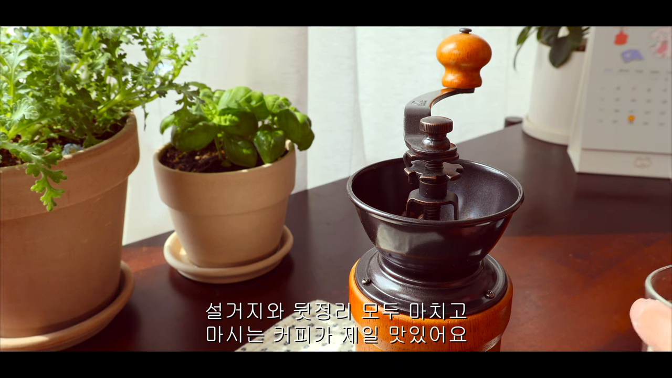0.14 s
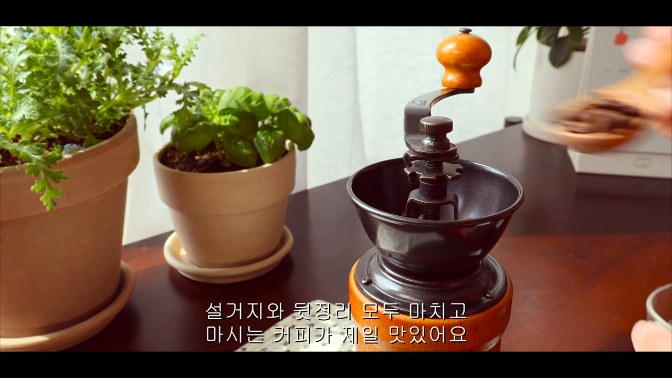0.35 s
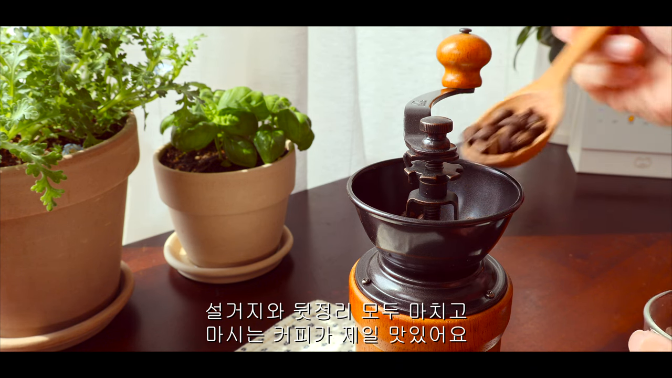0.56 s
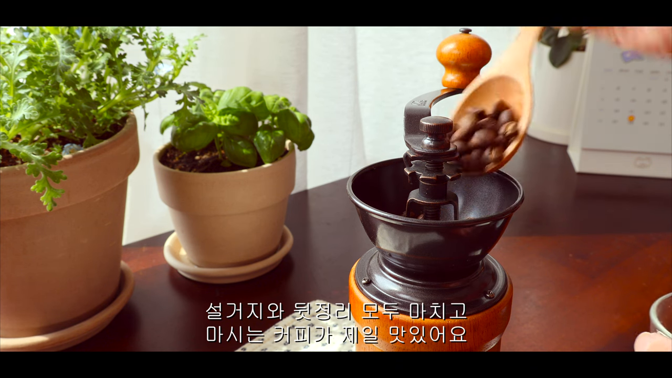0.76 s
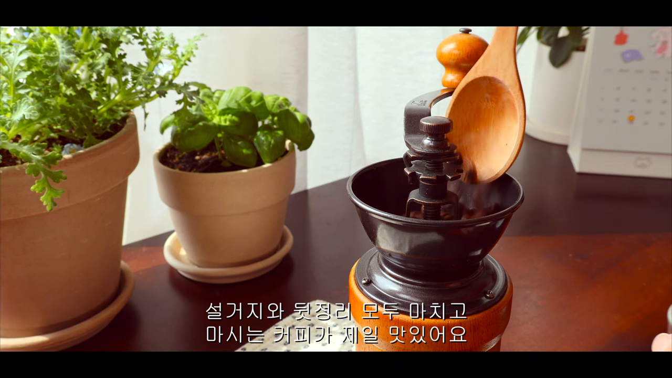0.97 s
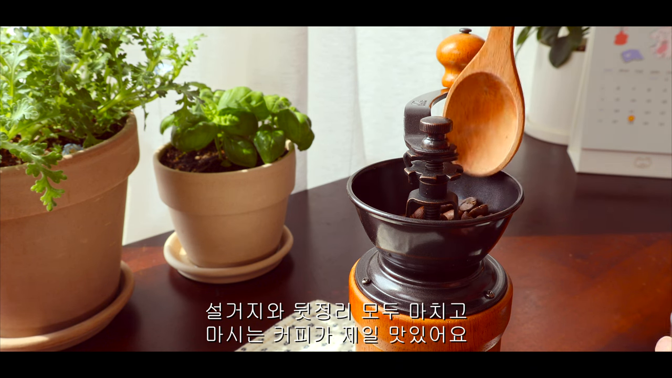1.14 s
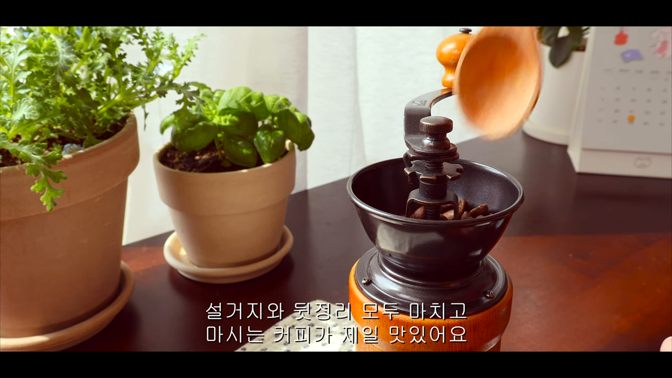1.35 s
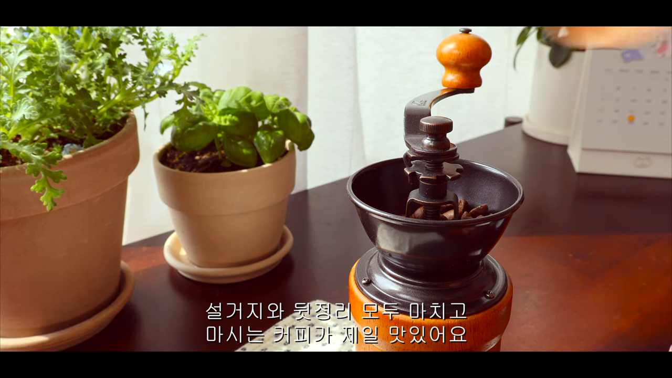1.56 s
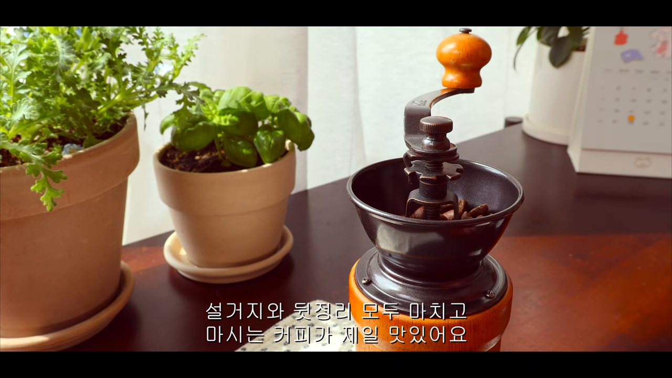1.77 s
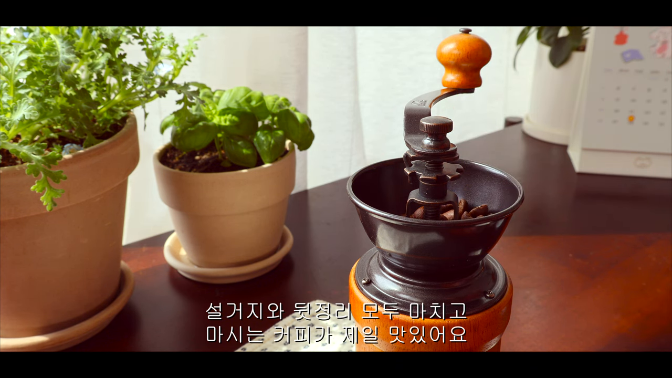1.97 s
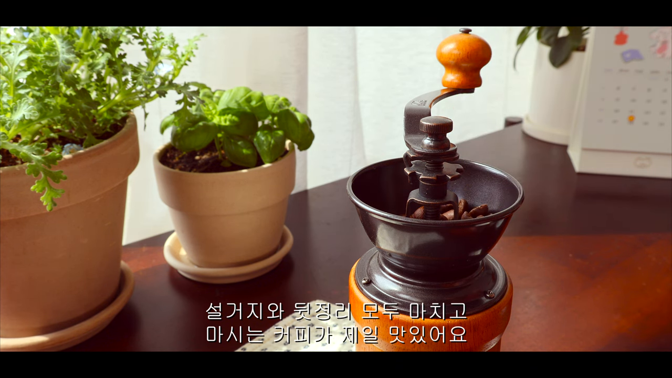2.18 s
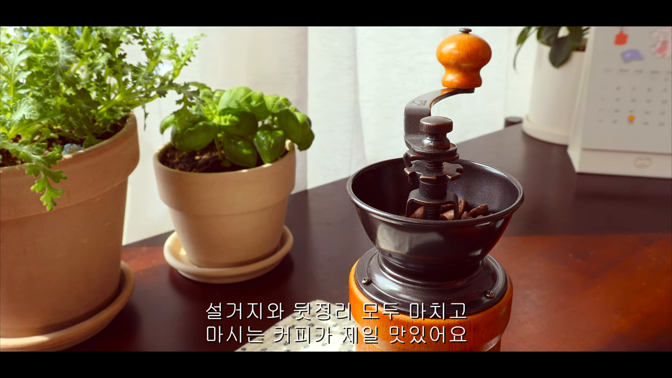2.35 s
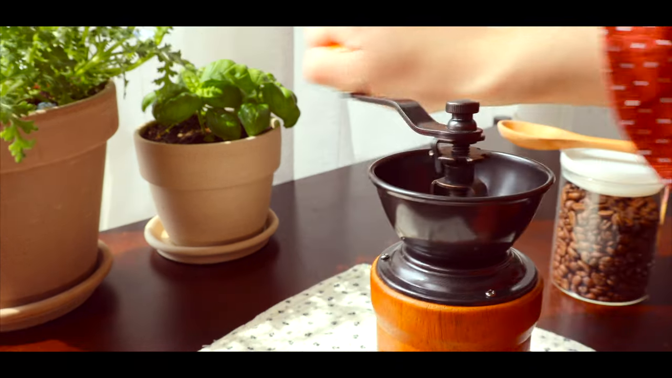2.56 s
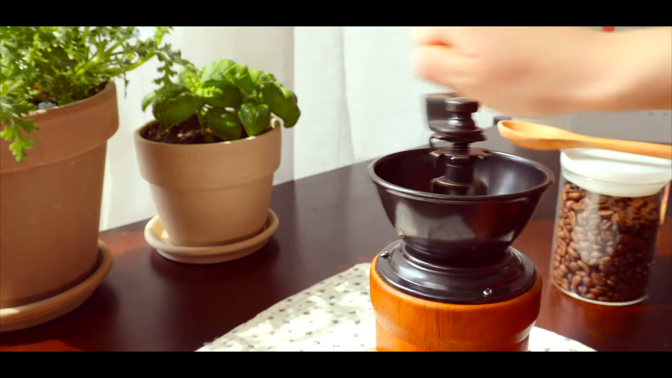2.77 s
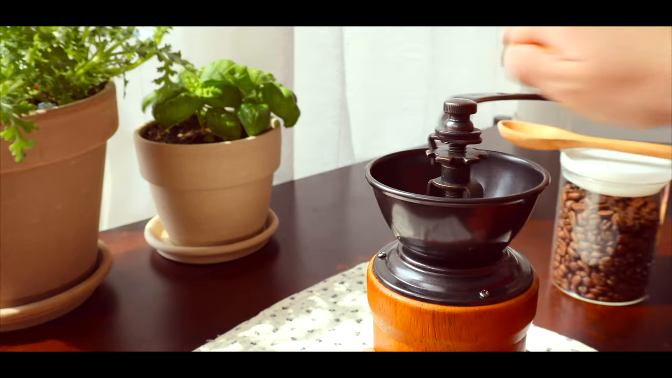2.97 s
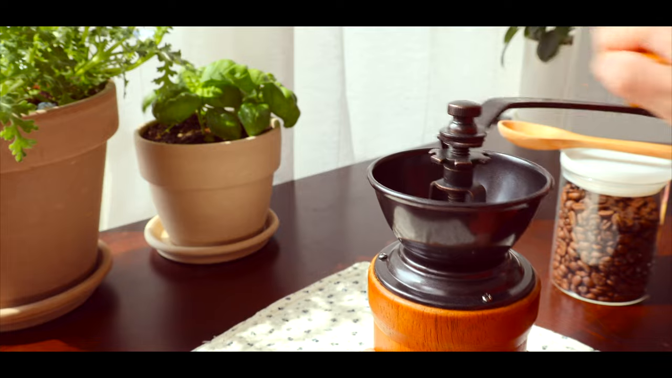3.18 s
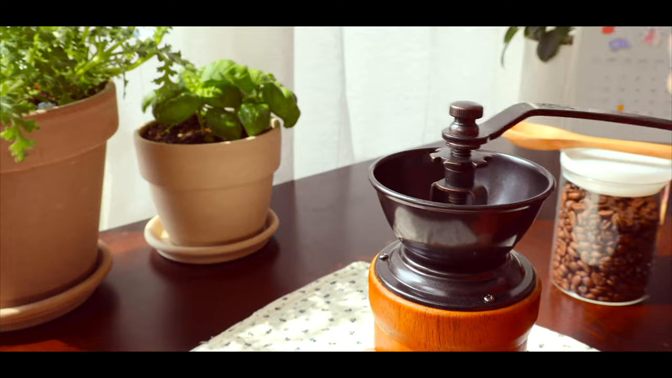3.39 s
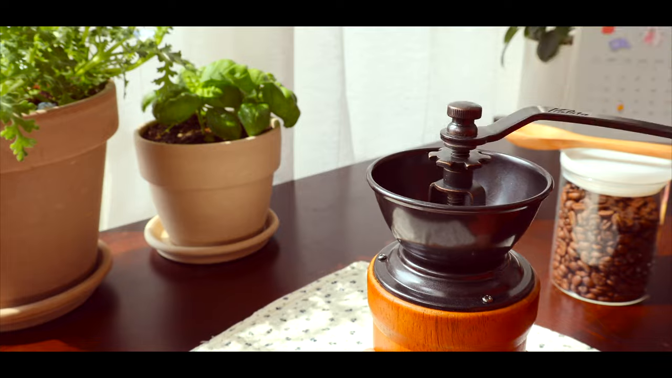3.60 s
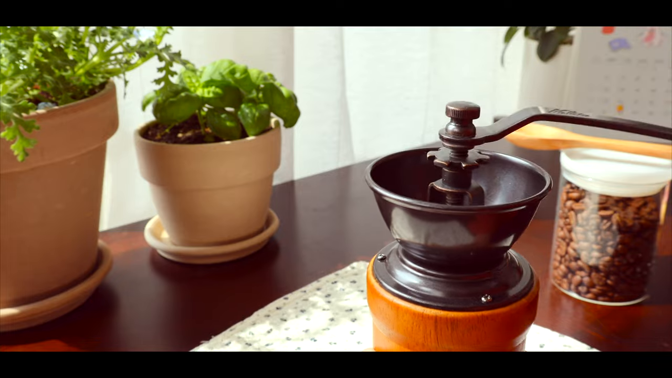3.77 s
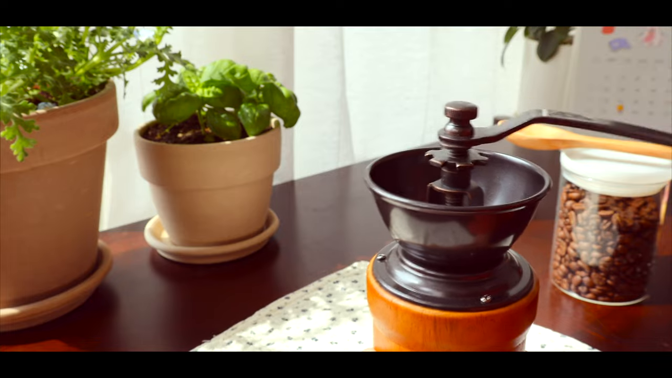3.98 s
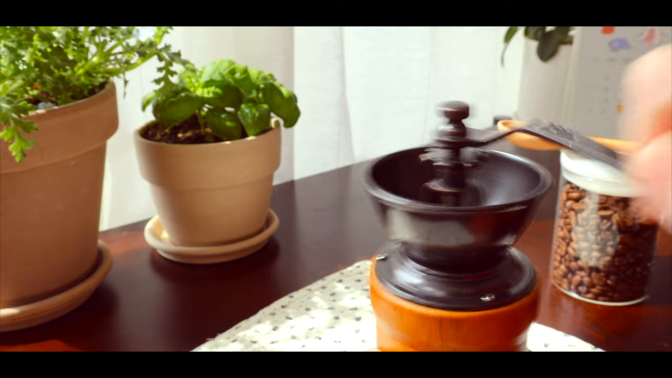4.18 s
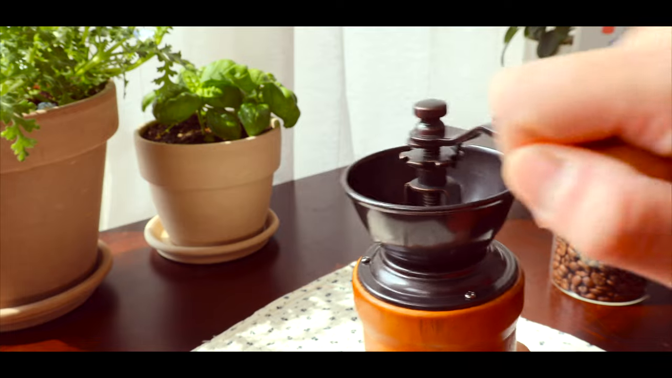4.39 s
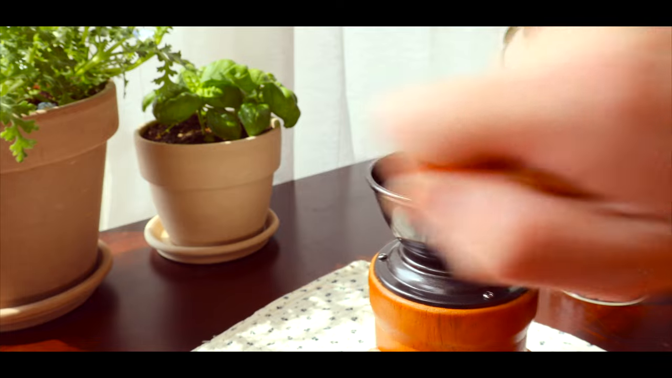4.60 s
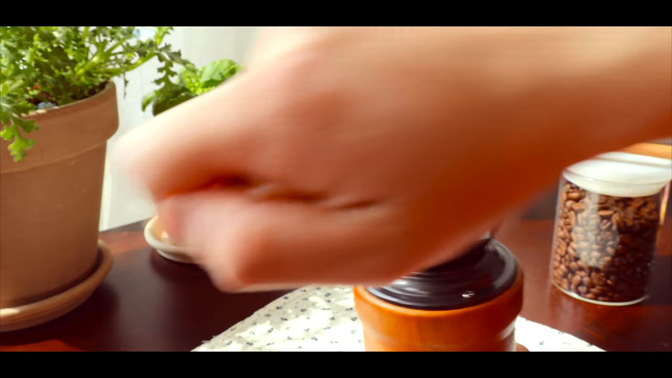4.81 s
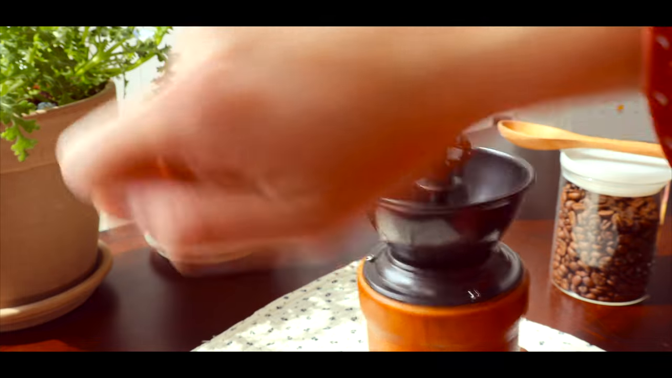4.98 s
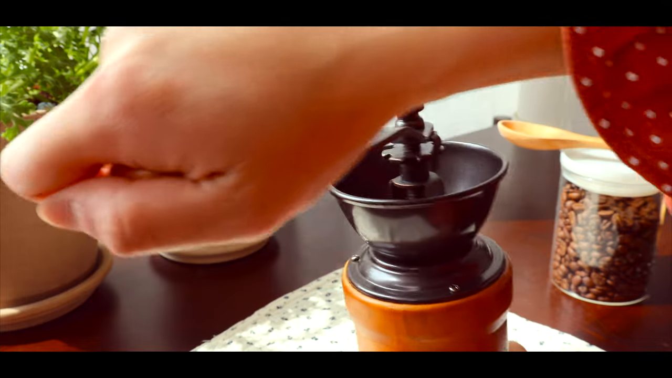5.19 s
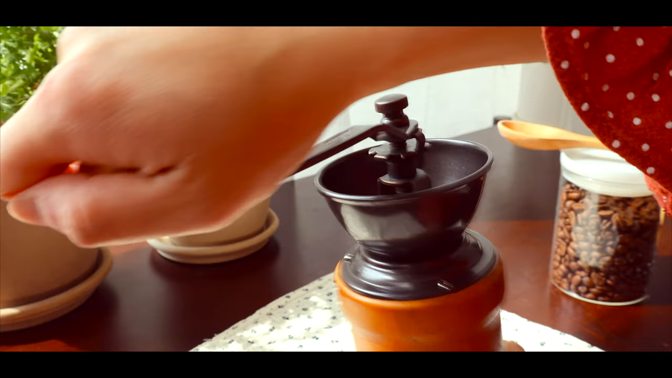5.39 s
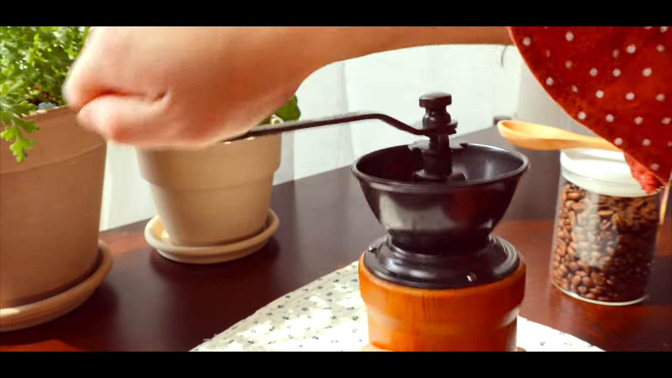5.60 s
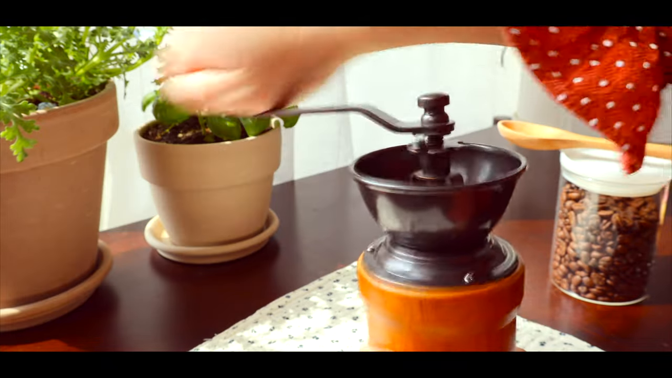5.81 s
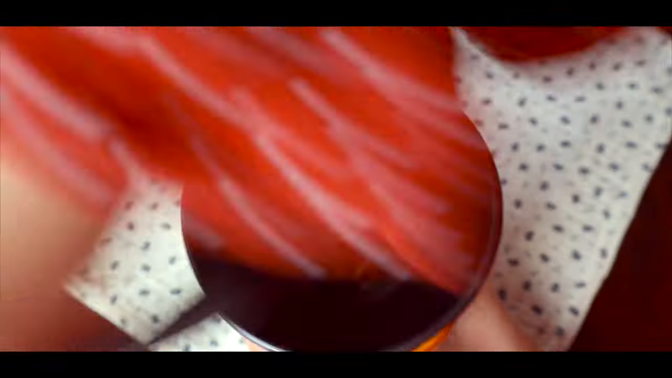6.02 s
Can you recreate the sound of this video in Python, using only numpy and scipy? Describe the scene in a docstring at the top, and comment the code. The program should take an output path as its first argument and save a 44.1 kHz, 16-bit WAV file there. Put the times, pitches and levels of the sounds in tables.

```python
"""Coffee beans in a hand mill

A spoonful of beans slides off a clicking wooden spoon into the iron hopper, whose decaying modes ring like a bell.
The crank is turned in fits and starts: noise bursts drive resonances of burr and wooden box as beans snap
and their pieces crunch. A rubbing shaft and a faint table rumble are filtered noise.
A small kitchen answers with short noise tails, over a low steady room noise.
"""
import sys
import numpy as np
from scipy import signal
from scipy.fft import rfft, irfft, next_fast_len
from scipy.io import wavfile

SR = 44100
rng = np.random.default_rng(int(sys.argv[2]) if len(sys.argv) > 2 else 0)


def materialize(psi):
    """Save the field psi as 16-bit PCM at rate SR to the path in sys.argv[1].

    A 1-D psi becomes a single channel; in a 2-D psi each row is a channel.
    """
    bounded = np.clip(np.atleast_2d(psi).T, -1, 1)
    quanta = np.round(bounded * 32767).astype(np.int16)
    wavfile.write(sys.argv[1], SR, quanta)


N = 266805  # samples in the scene

# Whole beans snapping between the burrs. Each row: start in seconds, burr pitch in Hz,
# burr ring in dB, box knock in dB, treble snap in dB.
BEAN_CRACKS = [(2.471, 2820, -33.5, -47, -41), (2.4841, 2690, -20.5, -31.5, -28),
               (2.4959, 2490, -27, -22, -32), (2.5451, 2910, -22, -28.5, -30.5),
               (2.5757, 2210, -22.5, -29, -29.5), (2.6095, 2530, -14.5, -18, -23.5),
               (2.631, 2500, -30, -22, -30), (2.6645, 2600, -23.5, -25.5, -37),
               (2.7389, 2440, -17, -21.5, -23.5), (2.768, 2530, -19, -24.5, -19.5),
               (2.7803, 2550, -18.5, -23, -26), (2.797, 3220, -24.5, -39, -30),
               (2.836, 2560, -18.5, -49, -32), (2.8446, 2530, -15.5, -23, -29.5),
               (2.88, 2380, -11, -20, -16.5), (2.9482, 2500, -14.5, -27, -27.5),
               (2.9853, 2530, -17.5, -24.5, -40), (3.0282, 2420, -19, -37, -40),
               (3.043, 2586, -25.5, -35, -47), (3.1449, 2890, -13, -32, -22),
               (3.1503, 2500, -13.5, -21, -23.5), (3.184, 2480, -19.5, -35, -37),
               (3.2074, 2580, -28.5, -44, -38), (3.2484, 2450, -15.5, -30.5, -31.5),
               (3.308, 2460, -26, -37, -36.5), (3.3326, 2510, -26.5, -32, -43),
               (3.356, 2558, -24, -26.5, -37), (3.4268, 2530, -28, -38, -57), (3.4455, 2550, -31, -45, -47),
               (3.493, 2720, -40, -44, -49), (3.5065, 2560, -19, -33.5, -33.5),
               (3.5549, 2920, -22.5, -34.5, -26.5), (3.5778, 2560, -25, -32, -30),
               (3.5932, 2580, -19, -26.5, -33), (3.6412, 2510, -15.5, -28.5, -29.5),
               (3.7448, 2620, -39, -60, -65), (3.8356, 2540, -15, -29, -28.5),
               (3.8627, 2660, -17.5, -25.5, -15.5), (3.9934, 2630, -20.5, -35, -42),
               (4.0445, 2640, -18, -37, -32), (4.0562, 2790, -19, -29, -32.5),
               (4.112, 2560, -22, -27, -30.5), (4.1337, 2510, -13.5, -24, -27.5),
               (4.2503, 2930, -21, -23.5, -29), (4.324, 2757, -21.5, -29, -26),
               (4.3447, 2540, -27.5, -41, -37), (4.4231, 2610, -33.5, -43, -44),
               (4.4372, 2460, -32, -50, -37.5), (4.581, 2580, -32, -31, -33), (4.5886, 2520, -12, -17, -19),
               (4.607, 2563, -16, -23, -28), (4.6268, 2540, -17.5, -25, -24.5),
               (4.6666, 2580, -19, -29, -36), (4.7447, 2524, -21, -28, -31.5),
               (4.7782, 2560, -19.5, -30, -30), (4.8143, 2420, -21.5, -37, -35),
               (4.9681, 2535, -32, -42, -45), (5.002, 2210, -14.5, -18, -21.5),
               (5.0202, 2470, -14, -20, -22), (5.273, 2380, -25.5, -35, -34),
               (5.2847, 2470, -10.5, -24, -20), (5.4046, 2440, -29.5, -52, -47),
               (5.4169, 2490, -18, -33, -31.5), (5.465, 2700, -19.5, -18.5, -23.5),
               (5.4847, 2500, -9.5, -20, -21), (5.507, 2450, -30, -24, -28),
               (5.5596, 2400, -25, -25.5, -26), (5.5702, 2390, -23, -41, -31),
               (5.613, 2440, -17.5, -31, -27), (5.712, 2540, -29.5, -40.5, -41),
               (5.7492, 2466, -16.5, -24.5, -25.5), (5.7669, 2464, -18, -21, -30),
               (5.7949, 2530, -17, -19, -22.5), (5.8781, 2370, -20, -26, -31),
               (5.957, 2600, -25, -25.5, -37), (5.9666, 2520, -14, -23, -30),
               (5.9777, 2560, -20, -33, -28.5), (6.008, 2530, -21, -18, -30)]
# Pushes of the crank that crush beans. Each row: start in seconds, end in seconds, level in dB
# before the balance of the parts.
CRANK_PUSHES = [(2.5, 2.6, -30), (2.612, 2.67, -24.5), (2.708, 2.888, -29.5), (2.926, 3.391, -34.5),
                (3.539, 3.614, -38), (3.83, 3.868, -30), (4.034, 4.298, -30.5), (4.605, 4.82, -31),
                (5.014, 5.037, -32.5), (5.475, 5.524, -24), (5.565, 5.666, -31.5), (5.764, 5.886, -28),
                (5.962, 6.05, -26.5)]
# Brightness of the snaps over time. Each row: time in seconds, tilt in dB per octave.
SNAP_BRIGHTNESS = [(2.5, -6.5), (2.8, 2), (3.2, 15), (3.55, -2), (3.9, 8), (4.6, -2), (6.0, -5.5)]
# Level of the bass in the knocks over time. Each row: time in seconds, gain in dB.
KNOCK_BASS_GAIN = [(3.4, 0.5), (3.9, -5), (4.6, -3.5), (5.0, 4), (6.0, -0.5)]
# Resonances of the iron burr and shaft, main mode first. Each row: pitch in Hz, width in Hz, level in dB.
BURR_MODES = [(2420, 150, 5), (2915, 1180, -19.5), (2016, 310, -10), (3327, 340, -17)]
# Resonances of the wooden box. Each row: pitch in Hz, width in Hz, level in dB.
BOX_MODES = [(189, 40, -0.5), (233.7, 15.4, 2.5), (282, 32, 0.5), (337, 20, -1.5), (442, 64, 0.5),
             (610, 140, 0), (865, 233, 2.5), (1090, 143, 3), (1335, 395, -7)]
# Spectrum of a breaking bean. Each row: frequency in Hz, level in dB.
SNAP_SPECTRUM = [(1500, -11.5), (3500, 0), (4600, -12.5), (5900, 7), (7000, -2.5), (8300, 10), (9700, -6.5),
                 (11300, -8.5), (13000, -22.5), (16000, -25.5)]
# The hand takes the crank and the shaft rubs. Each row: start in seconds, end in seconds, level in dB.
SHAFT_RUBS = [(2.37, 2.47, -55)]
# The stream of beans landing in the hopper. Each row: start in seconds, end in seconds, level in dB.
BEAN_POUR = [(.95, 1.06, -22.5)]
# Single beans striking the hopper. Each row: start in seconds, click in dB, hopper ring in dB.
HOPPER_TAPS = [(0.897, -20, -45), (0.902, -20.5, -41), (.946, -39, -34), (0.989, -28, -29),
               (1.024, -26, -28), (1.061, -36, -32), (1.104, -25, -48), (1.133, -30, -35),
               (1.181, -38, -70), (1.309, -50, -67), (2.82, -33, -42.5)]
# Spectrum of a tumbling bean. Each row: frequency in Hz, level in dB.
BEAN_SPECTRUM = [(300, -31.5), (750, -26.5), (1050, -9.5), (1400, -13.5), (2100, -11.5), (2500, 2),
                 (3000, 1), (3500, -10), (4200, -15.5), (5700, -7.5), (7000, -15), (8300, -8.5),
                 (11000, -15.5), (16000, -12)]
# Modes of the iron bowl. Each row: pitch in Hz, time to decay by 60 dB in seconds.
BOWL_MODES = [(3010, .32), (5427, .4), (7823, .4), (10104, .14), (12412, .15), (14730, .1)]
# Strength of those bowl modes in the same order. Each entry: level in dB.
BOWL_LEVELS = [-1.5, 4, -5, 2.5, -5, -6]
# The wooden spoon clicks as beans shift on it. Each row: start in seconds, level in dB.
SPOON_CLICKS = [(.3761, -27.5), (0.393, -49), (.411, -37), (.42, -50), (.792, -44), (.808, -31),
                (.857, -29)]
# Beans sliding down the spoon. Each row: start in seconds, end in seconds, level in dB.
SPOON_SLIDE = [(.87, 1.02, -31)]
# Spectrum of the wooden spoon. Each row: frequency in Hz, level in dB.
SPOON_SPECTRUM = [(600, -40), (1500, -23), (2300, -16), (2700, 4.5), (3200, -12), (4000, -20.5),
                  (6000, -14), (7200, -26.5), (8700, -20.5), (12000, -32), (16000, -44)]
# The arm leans on the mill and the table rumbles. Each row: start in seconds, end in seconds, level in dB.
ARM_LEANS = [(2.55, 2.85, -51), (4.65, 5.05, -60)]
# Reverberation of the kitchen. Each row: frequency in Hz, time to decay by 60 dB in seconds.
KITCHEN_DECAY = [(150, 0.085), (700, 0.52), (2600, 0.37), (8000, 0.39), (15000, 0.19)]
# Tone of what the kitchen returns. Each row: frequency in Hz, level in dB.
RETURN_SPECTRUM = [(150, -4.5), (400, -0.5), (900, -3), (1700, 3.5), (2550, -3), (3200, 3.5), (4500, -3.5),
                   (6000, -0.5), (7500, 2.5), (9000, -8.5), (11500, -5), (16000, -8)]
# Spectrum of the room noise. Each row: frequency in Hz, level in dB.
ROOM_SPECTRUM = [(12, -41), (20, -9), (60, 0.5), (154, -9.5), (193, -10), (210, -6.5), (301, -10.5),
                 (399, -12.5), (472, -12), (718, -14.5), (1120, -17.5), (1220, -16.5), (2750, -24.5),
                 (14700, -32), (16000, -29.5)]

ROOM_DB = -50.5  # level of the room noise
TOP_HZ = 15780  # upper band limit
SPAN = SR // 100  # samples over which a hit's level counts (10 ms)
HIT = np.arange(4096) / SR  # time axis of one hit, seconds
BITE_S, EASE_S = 0.074, 0.12  # the crunch takes this long to rise and to fall by 60 dB
CHIPS_PER_S, CHIP_DB, CHIP_SPREAD_DB = 60, 0.5, 5  # chips: mean rate, level over the push, scatter
CHIP_KNOCK_DB, CHIP_SNAP_DB = -12, -16.5  # chips: knock and snap against their ring
CHIP_HZ, CHIP_SCATTER = 2550, 0.049  # chips: burr pitch and the share by which it varies
# Snaps harder than a plain one are brighter, in dB per octave for each dB.
BRIGHT_PER_DB, PLAIN_SNAP_DB = 0.57, -30.5
# A bean that knocks harder than this jams the burr: its main mode widens by this share per dB.
JAM_KNOCK_DB, JAM_DAMPING = -28, 0.13


def cracks():
    """Whole beans break one by one between the burrs, the harder snaps brighter."""
    out = np.zeros(N)
    for s, pitch, ring, knock, snap in BEAN_CRACKS:
        bright = at_time(SNAP_BRIGHTNESS, s) + BRIGHT_PER_DB * (snap - PLAIN_SNAP_DB)
        add(out, s, fracture(pitch, ring, knock, snap, bright))
    return out


def fracture(pitch, ring_db, knock_db, snap_db, bright, splinter_db=-6, edge_db=4):
    """One bean splits with a snap; the freed burr rings and jolts the box."""
    # The wedged bean retunes and damps the burr's main mode.
    _, width, main_db = BURR_MODES[0]
    jam = 1 + JAM_DAMPING * max(knock_db - JAM_KNOCK_DB, 0)
    main = (pitch, width * jam, main_db)
    burr = resonate(burst(t60=0.0097, rise=0.00035), [main, *BURR_MODES[1:]])
    box = highpass(resonate(burst(t60=0.021), BOX_MODES), hz=150)
    # The first split is the sharpest, and stray ticks follow the break.
    edge = amp(edge_db) * burst(t60=0.0067)
    body = burst(t60=0.019)
    splinters = amp(splinter_db) * burst(t60=0.047) * (rng.random(len(HIT)) < 0.06)
    # The tilt pivots at 8 kHz and works between 4 and 12 kHz.
    tilted = [(hz, db + bright * np.log2(np.clip(hz, 4000, 12000) / 8000)) for hz, db in SNAP_SPECTRUM]
    split = colour(edge + body + splinters, tilted)
    return amp(ring_db) * blow(burr) + amp(knock_db) * blow(box) + amp(snap_db) * blow(split)


def chips(count=240):
    """Smaller pieces break at random while the crank is pushed, louder under a harder push."""
    out = np.zeros(N)
    draws = rng.uniform(-1, 1, (count, 3))  # time gap, size and grip of each chip
    times = CRANK_PUSHES[0][0] + np.cumsum(1 + draws[:, 0]) / CHIPS_PER_S
    for s, (_, size, grip) in zip(times, draws):
        for start, end, push_db in CRANK_PUSHES:
            if start < s < end:
                pitch = CHIP_HZ * (1 + CHIP_SCATTER * grip)
                db = push_db + CHIP_DB + CHIP_SPREAD_DB * size
                bright = at_time(SNAP_BRIGHTNESS, s)
                add(out, s, fracture(pitch, db, db + CHIP_KNOCK_DB, db + CHIP_SNAP_DB, bright))
    return out


def crunch(burr_db=-6, box_db=-5, snap_db=-12, grit_db=-17):
    """The pieces crumble in a dense crackle that shakes the same burr and box."""
    force = grains(rate=700, spread_db=3.0, t60=0.0029)
    burr = amp(burr_db) * unit(resonate(force, BURR_MODES))
    box = amp(box_db) * unit(highpass(resonate(force, BOX_MODES), hz=148))
    snap = amp(snap_db) * unit(colour(force, SNAP_SPECTRUM))
    grit_force = grains(rate=900, spread_db=0.5, t60=0.028)
    grit = amp(grit_db) * unit(resonate(grit_force, [(4400, 1000, -9.0), (7050, 1900, -8.0)]))
    return swells(CRANK_PUSHES, BITE_S, EASE_S) * (burr + box + grit + snap)


def weight(x, hz=420):
    """The knocks thin out and fill out again in the bass."""
    low = signal.sosfiltfilt(signal.butter(2, hz, fs=SR, output="sos"), x)
    bass_gain = amp(at_time(KNOCK_BASS_GAIN, np.arange(N) / SR))
    return x + (bass_gain - 1) * low


def shaft():
    """Light dry rubbing before the burrs bite: noise through the shaft's resonances."""
    modes = [(2850, 310, 4), (6430, 630, -2), (9000, 900, -10), (12200, 900, -11)]
    rub = unit(resonate(rng.standard_normal(N), modes))
    return swells(SHAFT_RUBS, attack_s=0.59, release_s=0.11) * rub


def beans(bowl_db=13):
    """Beans tumble and click on each other; the stream sets the iron ringing, and so does each direct hit."""
    t = np.arange(SR // 2) / SR
    clicks = grains(rate=800, spread_db=4, t60=0.002)
    flow = swells(BEAN_POUR, attack_s=0.23, release_s=0.28)
    # A mode's width follows from its decay time.
    bowl = [(hz, np.log(1000) / (np.pi * t60), db) for (hz, t60), db in zip(BOWL_MODES, BOWL_LEVELS)]
    tumble = flow * unit(colour(clicks, BEAN_SPECTRUM))
    ringing = amp(bowl_db) * resonate(flow * unit(clicks), bowl)
    out = tumble + ringing
    for s, click_db, ring_db in HOPPER_TAPS:
        add(out, s, amp(click_db) * blow(colour(burst(t60=0.02), BEAN_SPECTRUM)))
        for (hz, t60), db in zip(BOWL_MODES, BOWL_LEVELS):
            level = amp(ring_db + db + rng.standard_normal())  # every hit excites the modes differently
            tone = np.sin(2 * np.pi * (hz * t + rng.random()))
            add(out, s, level * fade(t, t60) * tone)
    return out


def spoon():
    """Short woody clicks as the spoon is lifted and tipped, then the beans slide as fine grains."""
    slide = unit(colour(grains(rate=580, spread_db=1.0, t60=0.0021), SPOON_SPECTRUM))
    out = swells(SPOON_SLIDE, attack_s=0.25, release_s=0.15) * slide
    for s, db in SPOON_CLICKS:
        click = colour(burst(t60=0.0073, rise=0.00042), SPOON_SPECTRUM)
        add(out, s, amp(db) * blow(click))
    return out


def table():
    """A faint deep rumble under the weight of the arm: noise through two low resonances."""
    rumble = unit(resonate(rng.standard_normal(N), [(53.7, 14, 8), (67, 20, -13)]))
    return swells(ARM_LEANS, attack_s=2.1, release_s=1.7) * rumble


def kitchen(x, near_db=-13, near_t60=0.071, tail_db=-12.5, size=4096):
    """Near reflections answer first, then a short diffuse room tail."""
    count = N // size + 1
    hz, t, z = signal.stft(rng.standard_normal((count, SR // 2)), SR, nperseg=256)
    decay = fade(t, along(KITCHEN_DECAY, hz)[:, None])
    tails = signal.istft(z * decay, SR, nperseg=256)[1]
    out = np.zeros(N)
    # Each block of sound draws new noise tails, which keeps the colour smooth.
    for k, tail in enumerate(tails):
        near = burst(near_t60)
        answer = np.zeros(len(tail))
        add(answer, 0.004, amp(near_db) * near / np.linalg.norm(near))
        add(answer, 0.009, amp(tail_db) * tail / np.linalg.norm(tail))
        block = x[k * size:][:size]
        add(out, k * size / SR, signal.fftconvolve(block, answer))
    return colour(out, RETURN_SPECTRUM)


def room_noise():
    """Low steady room noise: white noise given the room's spectrum."""
    return amp(ROOM_DB) * unit(colour(rng.standard_normal(N), ROOM_SPECTRUM, size=8192))


def burst(t60, rise=1e-5):
    """The force of one hit: a short run of random slips that swells and dies."""
    return rng.standard_normal(len(HIT)) * fade(HIT, t60) * (1 - np.exp(-HIT / rise))


def grains(rate, spread_db, t60):
    """Tiny noise bursts at random moments, of unequal size."""
    sizes = amp(spread_db * np.minimum(rng.standard_normal(N), 2))
    starts = sizes * (rng.random(N) < rate / SR)
    return signal.fftconvolve(starts, fade(HIT, t60))[:N] * rng.standard_normal(N)


def swells(rows, attack_s, release_s):
    """Gain per sample: each (start, end, dB) row rises, holds and falls; attack and release span 60 dB."""
    t = np.arange(N) / SR
    gains = []
    for start, end, db in rows:
        rise = fade(np.maximum(start - t, 0), attack_s)
        fall = fade(np.maximum(t - end, 0), release_s)
        gains.append(amp(db) * rise * fall)
    return np.max(gains, axis=0)


def resonate(x, modes):
    """x through (Hz, width, dB) resonances that fall off on both sides, alternating in sign."""
    m = next_fast_len(len(x) + 4096)
    f = np.fft.rfftfreq(m, 1 / SR)
    response = 0
    for k, (centre, width, db) in enumerate(modes):
        band = 1j * f * width / (centre * centre - f * f + 1j * f * width)
        response = response + (-1) ** k * amp(db) * band
    return irfft(rfft(x, m) * response, m)[:len(x)]


def colour(x, spectrum, size=2048):
    """x through a causal filter with the given (Hz, dB) shape."""
    # Folding the cepstrum gives the minimum-phase filter.
    cepstrum = irfft(np.log(amp(along(spectrum, np.fft.rfftfreq(size, 1 / SR)))))
    cepstrum[1:size // 2] *= 2
    cepstrum[size // 2 + 1:] = 0
    impulse = irfft(np.exp(rfft(cepstrum)))
    return signal.fftconvolve(x, impulse)[:len(x)]


def highpass(x, hz):
    """Steep bass cut."""
    return signal.sosfilt(signal.butter(4, hz, "highpass", fs=SR, output="sos"), x)


def fade(t, t60):
    """Exponential decay by 60 dB in t60 seconds."""
    return np.exp(-np.log(1000) * t / t60)


def along(points, hz):
    """(Hz, value) points read on a log axis."""
    f, v = np.transpose(points)
    return np.interp(np.log(hz + 1), np.log(f), v)


def at_time(points, s):
    """(seconds, value) points read at time s."""
    return np.interp(s, *np.transpose(points))


def amp(db):
    """Decibels to gain."""
    return 10 ** (np.asarray(db) / 20)


def unit(x):
    """Scaled to rms 1."""
    return x / np.sqrt(np.mean(x ** 2) + 1e-20)


def blow(x):
    """Scaled to the energy of SPAN samples at rms 1."""
    return x * np.sqrt(SPAN / (np.sum(x ** 2) + 1e-20))


def add(track, s, sound):
    """Mix a sound in at time s."""
    part = track[round(s * SR):][:len(sound)]
    part += sound[:len(part)]


def scene():
    """Mill and beans close by, in the kitchen."""
    grinding = weight(cracks() + chips() + crunch())
    mill = grinding + shaft() + beans() + spoon()
    return (mill + table() + kitchen(mill) + room_noise())[None]


def record(dry):
    """The loudest snaps round off towards full scale; nothing passes above the band limit."""
    clipped = dry / (1 + np.abs(dry) ** 8) ** (1 / 8)
    m = next_fast_len(N + SR // 2)
    passband = np.fft.rfftfreq(m, 1 / SR) < TOP_HZ
    return irfft(rfft(clipped, m) * passband, m)[..., :N]


dry = scene()
out = record(dry)
materialize(out)
```